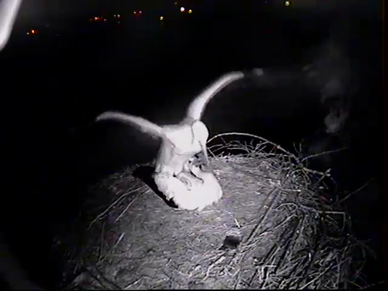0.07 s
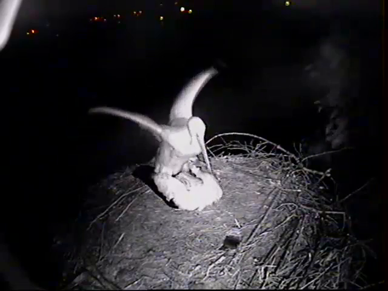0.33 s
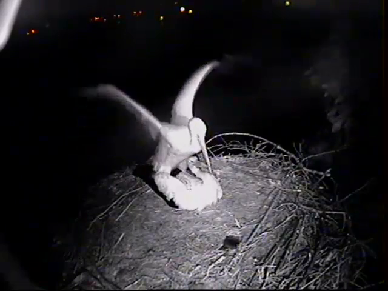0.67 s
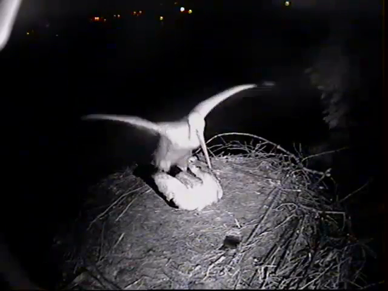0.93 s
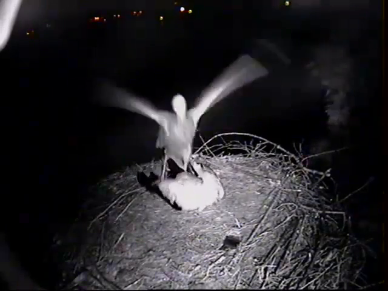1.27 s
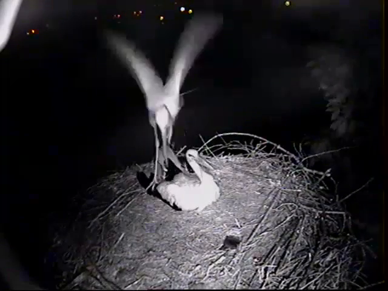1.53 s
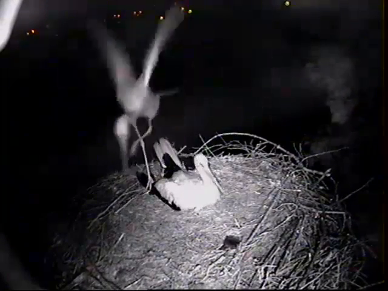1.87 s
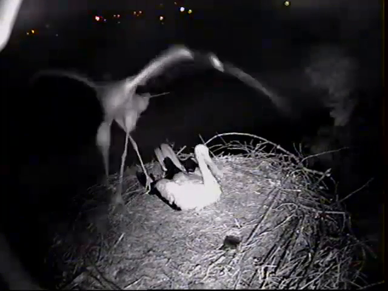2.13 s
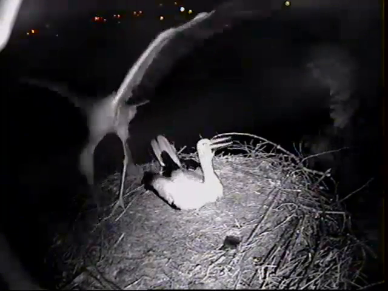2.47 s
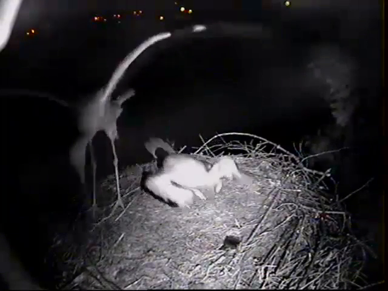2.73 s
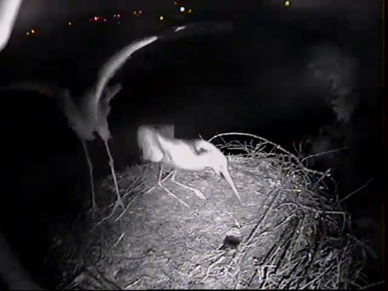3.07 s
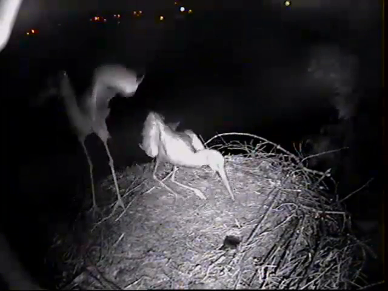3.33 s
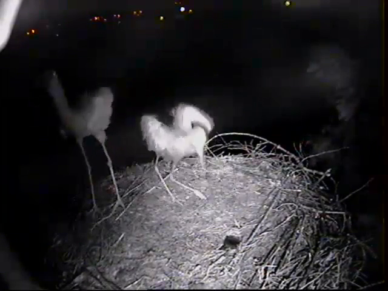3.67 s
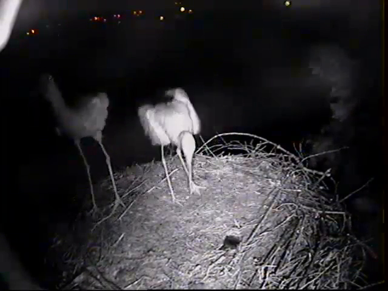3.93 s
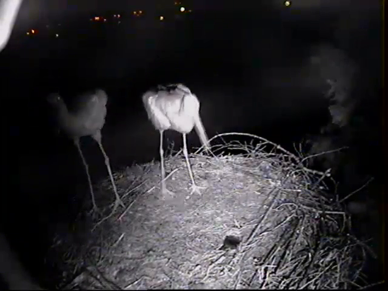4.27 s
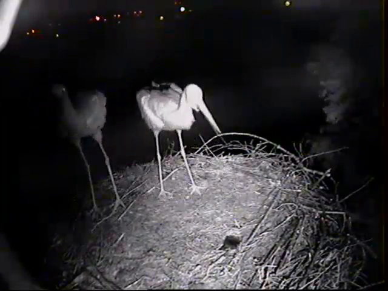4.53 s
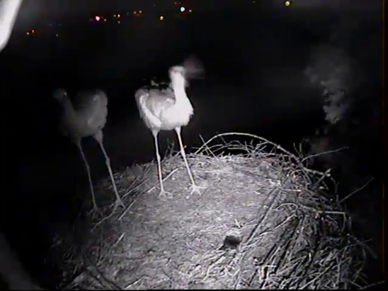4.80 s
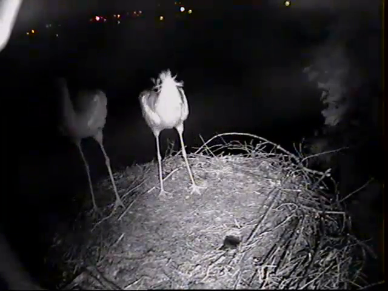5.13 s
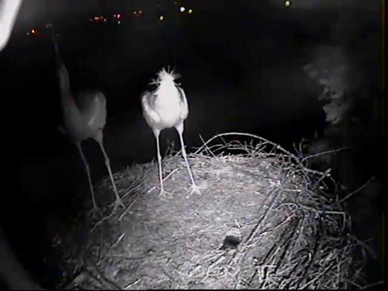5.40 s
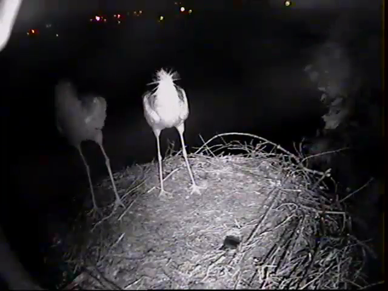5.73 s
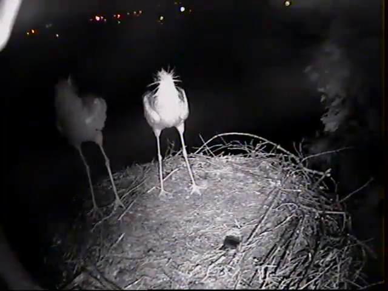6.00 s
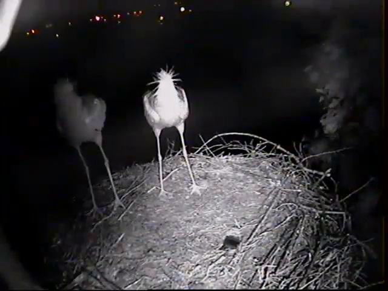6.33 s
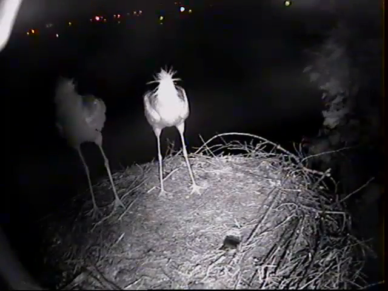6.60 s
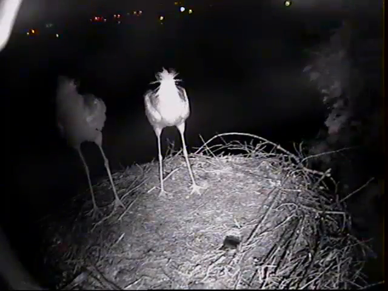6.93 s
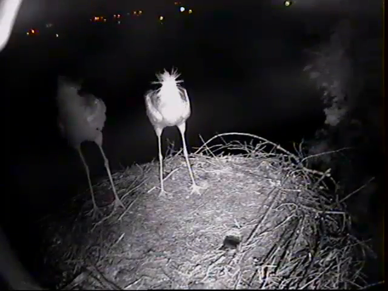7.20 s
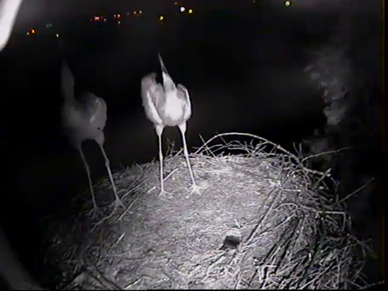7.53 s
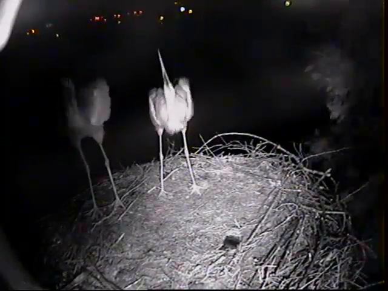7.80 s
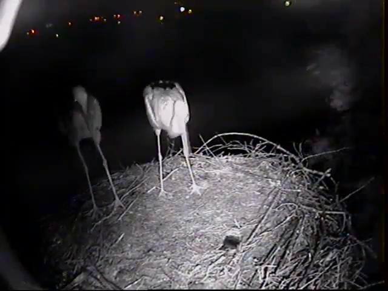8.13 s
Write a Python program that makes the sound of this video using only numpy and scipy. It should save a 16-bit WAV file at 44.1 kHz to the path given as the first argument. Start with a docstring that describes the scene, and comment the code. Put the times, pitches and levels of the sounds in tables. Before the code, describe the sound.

Two storks clatter their bills rapidly after a few whistling wingbeats and twig cracks, with wind rumbling on the microphone.

```python
"""Storks clattering on a night nest.

One bird flaps off the other's back, air whistling through its feathers, and twigs crack underfoot.
Then both clatter their bills: ringing mandibles over a hollow throat pouch, at two drifting tempos.
Gusts rumble on the microphone and overload its input, so the clacks come through crushed."""
import sys
import numpy as np
from scipy import signal
from scipy.fft import rfft, irfft
from scipy.io import wavfile

SR = 44100
rng = np.random.default_rng(int(sys.argv[2]) if len(sys.argv) > 2 else 0)


def wrap_up_sound(samples):
    """Save the sound to the file named by the first command line argument, as 16-bit audio."""
    columns = np.atleast_2d(samples).T
    # keep every value between -1 and 1, then stretch to whole-number steps
    tamed = np.clip(columns, -1, 1)
    steps = np.round(tamed * 32767).astype(np.int16)
    wavfile.write(sys.argv[1], SR, steps)


N = 360297


def undb(db):
    """Decibels to gain."""
    return 10 ** (np.asarray(db) / 20)


def add(track, start_s, sound):
    """Mix a sound into a track from a given time on."""
    i = int(start_s * SR)
    part = sound[:max(len(track) - i, 0)]
    track[i:i + len(part)] += part


def curve(time_s, points):
    """Read an automation curve of (time, value) points."""
    return np.interp(time_s, *np.transpose(points))


def noise(points, size=N):
    """Noise of rms 1, coloured by (frequency [Hz], level [dB]) points."""
    hz, db = np.transpose(points)
    bins = np.maximum(np.fft.rfftfreq(size, 1 / SR), 1)
    colour = undb(np.interp(np.log(bins), np.log(hz), db))
    x = irfft(rfft(rng.standard_normal(size)) * colour, size)
    return x / x.std()


def fade(t, t60):
    """Exponential decay, 60 dB down after t60 seconds."""
    return np.exp(-np.log(1000) * t / t60)


def saturate(x, rail, knee):
    """Overload: clean for small swings, flat beyond the rail."""
    return x / (1 + np.abs(x / rail) ** knee) ** (1 / knee)


# colour of the hiss: (frequency [Hz], relative level [dB])
HISS_COLOUR = [(100, 1.5), (600, 4.5), (1500, 1), (3000, 2), (5000, -4)]
def hiss(db):
    """A steady hiss: in the wind bed it is air rushing through the nest sticks; after the input, the
    microphone's own noise floor."""
    return undb(db) * noise(HISS_COLOUR)


# swell of the gusts: (time [s], level [dB])
GUST_LEVELS = [(0, 1), (.4, -6.5), (.95, -8), (1.15, -12), (1.68, -18), (1.971, -5.5), (2.15, -13),
               (2.4, -6.5), (2.67, -12.5), (3.15, 6), (3.6, 7), (3.9, 4), (4.8, 3), (5.4, 1.6), (5.9, -5),
               (7.1, 3.5), (7.6, 2.5), (7.9, 0.5)]
# colours of the deep buffeting and the finer eddies: (frequency [Hz], relative level [dB])
BUFFET_COLOUR = [(10, -28), (20, -4.5), (34, -2.5), (55, -5.5), (90, -13), (150, -23), (280, -43),
                 (900, -70.5)]
EDDY_COLOUR = [(40, -21), (100, -7.5), (200, -9.5), (400, -20), (1500, -55)]
def wind(eddy_db=-15, eddy_growth=1.2):
    """Gusts buffet the microphone; small eddies swell faster than the low rumble."""
    gust_db = curve(np.arange(N) / SR, GUST_LEVELS)
    rumble = undb(gust_db) * noise(BUFFET_COLOUR)
    eddies = undb(eddy_db + eddy_growth * gust_db) * noise(EDDY_COLOUR)
    return rumble + eddies


# colour of the echoes around the nest: (frequency [Hz], relative level [dB])
ECHO_COLOUR = [(400, -16), (780, 12.5), (1150, 5), (1550, 10), (2100, 8.5), (2650, 7), (3300, 16),
               (4800, 11.5)]
def reflections(x, db, t60, build_s):
    """A dense patter of echoes that builds up and dies away."""
    t = np.arange(min(len(x), int(SR / 2))) / SR
    echoes = noise(ECHO_COLOUR, size=len(t)) * fade(t, t60) * (1 - fade(t, build_s))
    return undb(db) * signal.fftconvolve(x, echoes / np.linalg.norm(echoes))[:len(x)]


def flutter(width_hz, size):
    """A random complex amplitude that smears a pure tone into a breathy band."""
    z = signal.sosfilt(signal.butter(2, width_hz / 2, fs=SR, output="sos"), rng.standard_normal((2, size)))
    return (z[0] + 1j * z[1]) / z.std()


# wing strokes: (time of top speed [s], half length [s], relative level [dB], top pitch [Hz], rasp [dB])
WING_STROKES = [(.01, 0.03, -14.5, 1507, -10), (1.007, 0.039, -14, 1734, -6.5),
                (1.41, 0.034, -17, 1574, -5), (1.783, 0.036, -20, 1530, 6.5),
                (1.997, 0.041, -14.5, 1570, -3), (2.343, 0.036, -26.5, 1032, 2.5),
                (2.671, 0.047, -30.5, 900, 1.5)]
# rasp of the feather vanes: (frequency [Hz], relative level [dB])
RASP_COLOUR = [(2100, -21), (2600, 3.5), (2900, -5), (3300, 2.5), (3800, -11), (4600, -9.5)]
def wings(bend=0.14, width_hz=460, release_stretch=1.3):
    """Air sings through the flight feathers: a whistle and a rasp that follow the stroke's speed."""
    out = np.zeros(N)
    for peak_s, half_s, db, hz, rasp_db in WING_STROKES:
        start_s = max(peak_s - 2 * half_s, 0)
        stroke = (start_s + np.arange(int(SR / 3)) / SR - peak_s) / half_s
        # steep attack, gentler release
        speed = np.exp(-np.where(stroke < 0, stroke ** 2, stroke / release_stretch) ** 2)
        phase = 2 * np.pi * np.cumsum(hz * (1 - bend * (1 - speed))) / SR
        whistle = (flutter(width_hz, len(stroke)) * np.exp(1j * phase)).real
        rasp = undb(rasp_db) * noise(RASP_COLOUR, size=len(stroke))
        add(out, start_s, undb(db) * speed * (whistle + rasp))
    return out


# twig cracks: (time [s], level [dB])
TWIG_CRACKS = [(2.832, -9), (2.886, -19), (2.910, -15), (2.923, -19), (2.937, -9.5), (2.958, 1.5),
               (2.964, -12), (4.791, -8), (4.806, -1)]
def twigs():
    """Dry sticks break underfoot in short, broadband cracks."""
    out, t = np.zeros(N), np.arange(int(SR / 10)) / SR
    for start_s, db in TWIG_CRACKS:
        crack = noise([(200, 20.0), (900, 3.5), (3000, 2), (5000, 1.5), (9000, -28)], size=len(t))
        add(out, start_s, undb(db) * fade(t, t60=0.048) * crack)
    return out


def mode(t, hz, t60, db):
    """One struck resonance."""
    return undb(db) * fade(t, t60) * np.sin(2 * np.pi * hz * t)


# the bill's upper ring: (frequency before tuning [Hz], t60 [s], relative level [dB])
UPPER_MODES = [(2457, 0.0095, -9.5), (2620, 0.02, -9), (3056, 0.0069, -14), (3558, 0.024, -20),
               (3970, 0.051, -24.5), (4575, 0.079, -29.5)]
def clack(pouch_hz, mandible_hz, hard_db, pitch_ratio):
    """The mandibles strike and ring over the hollow pouch; harder hits wake the upper modes."""
    t = np.arange(int(SR / 10)) / SR
    scatter = rng.standard_normal((len(UPPER_MODES), 4))
    body = mode(t, pouch_hz, t60=0.021, db=-6.0) - mode(t, mandible_hz, t60=0.015, db=-2.0)
    body += mode(t, mandible_hz * 1.4, t60=0.0028, db=-9)  # the other mandible's short, higher knock
    upper = 0
    for k, (hz, t60, db) in enumerate(UPPER_MODES):
        detune, accent, tail_accent, tail_detune = scatter[k]
        struck_hz = pitch_ratio * hz * (1 + 0.0193 * detune)
        upper += (-1) ** k * mode(t, struck_hz, t60, db + 3 * accent)
        # as the bill springs open, a faint tail rings on at a shifted pitch
        tail_hz = struck_hz * (1 + 0.0416 * tail_detune)
        upper += mode(t, tail_hz, t60=0.092, db=db - 15.5 + 5.3 * tail_accent)
    burst = noise([(300, 0.5), (700, 17.0), (3000, -36), (5500, 2)], size=len(t))
    crack = undb(-13.5) * fade(t, t60=0.033) * burst
    direct = body + undb(hard_db) * upper + crack
    # fresh near reflections on every hit, as the head swings
    return direct + reflections(direct, db=-9, t60=0.059, build_s=0.28)


def snap(pouch_hz, mandible_hz, hard_db, pitch_ratio, touch_s=0.0045, rebound_s=0.0024):
    """The long mandibles touch, shut fully and bounce once: (delay [s], sound) for each contact."""
    early, late = .5 + rng.random(2)
    contacts = [(-touch_s * early, -21), (0, 0), (rebound_s * late, -5.5)]
    return [(delay_s, undb(db) * clack(pouch_hz, mandible_hz, hard_db, pitch_ratio))
            for delay_s, db in contacts]


# the throat pouch tightens as the head is thrown back: (time [s], resonance before tuning [Hz])
POUCH_PITCH = [(3.0, 648), (4.5, 701), (5.5, 737), (6.4, 794), (7.57, 912), (7.67, 758)]
def clatter(tempo, note, level_db, hard_db, haste_db, warm_up_s, pitch_ratio,
            start_db=-13, fade_db_per_s=-1.0, easy_clacks_per_s=7.46):
    """One bird's roll of snaps: it starts softly, warms up to full force, then slowly grows quieter."""
    out = np.zeros(N)
    now_s = first_s = tempo[0][0]
    while now_s < N / SR:
        rate, elapsed_s = curve(now_s, tempo), now_s - first_s
        force, hardness, detune, pouch_detune = rng.standard_normal(4)
        envelope_db = start_db * max(1 - (elapsed_s / warm_up_s) ** 2, 0) + fade_db_per_s * elapsed_s
        # a faster bill opens less and strikes more lightly: haste_db per extra clack a second
        db = level_db + envelope_db + haste_db * (rate - easy_clacks_per_s) + 1.93 * force
        mandible_hz = curve(now_s, note) * (1 + 0.03 * detune)
        pouch_hz = pitch_ratio * curve(now_s, POUCH_PITCH) * (1 + 0.069 * pouch_detune)
        for delay_s, sound in snap(pouch_hz, mandible_hz, hard_db + 2.0 * hardness, pitch_ratio):
            add(out, now_s + delay_s, undb(db) * sound)
        now_s += 1 / rate
    return out


# pace of the bird mid-nest and its mate at the rim, from the first clack: (time [s], tempo [clacks/s])
CENTRE_TEMPO = [(3.084, 7.75), (3.34, 7.67), (3.93, 8.17), (4.97, 8.52), (5.26, 11.45), (5.74, 11.92),
                (6.3, 11.11), (6.94, 10.24), (7.51, 8.74), (7.81, 8.1)]
RIM_TEMPO = [(3.198, 6.58), (3.4, 7.57), (3.83, 6.99), (4.29, 7.33), (4.68, 9.91), (5.53, 9.85),
             (5.91, 9.19), (6.84, 8.61), (7.32, 7.77), (7.77, 7.23)]
# each bill's note glides as the head swings back and forward: (time [s], mandible pitch [Hz])
CENTRE_NOTE = [(3.6, 1465), (5.2, 1538), (7.2, 1554), (8.05, 2050)]
RIM_NOTE = [(3.6, 1760), (4.1, 1910), (4.6, 2090), (4.85, 1550), (6.7, 1547), (8.0, 2080)]
def bill_duet():
    """A loud, round clatter and a lighter, sharper one drift in and out of step."""
    centre = clatter(CENTRE_TEMPO, CENTRE_NOTE, level_db=13, hard_db=-4.5, haste_db=-1.72,
                     warm_up_s=0.52, pitch_ratio=0.96)
    rim = clatter(RIM_TEMPO, RIM_NOTE, level_db=6.0, hard_db=2, haste_db=-1.0,
                  warm_up_s=0.79, pitch_ratio=1.02)
    return centre + rim


def scene():
    """Birds and wind in mono; roofs and trees around the nest return a faint wash of the clatter."""
    bills = bill_duet()
    wash = reflections(bills, db=-19.5, t60=1.0, build_s=0.92)
    bed = wind() + undb(0.5) * wings() + hiss(db=-28.5)
    # a gust that pins the microphone at its limit chokes the soft sounds; bills and twigs break through
    choked_bed = saturate(bed, rail=0.7197, knee=43)
    return (choked_bed + bills + wash + twigs())[None]


def record(dry, band_hz=5030, top_hz=15900, ceiling=np.sqrt(.5)):
    """The input overloads and hisses, a steep low-pass dulls it, and the output clips the overshoot."""
    crushed = saturate(dry, rail=0.74, knee=35) + hiss(db=-35)
    narrow = signal.sosfiltfilt(signal.ellip(10, .05, 50, band_hz, fs=SR, output="sos"), crushed)
    clipped = np.clip(narrow, -ceiling, ceiling)
    return signal.sosfiltfilt(signal.ellip(10, .05, 50, top_hz, fs=SR, output="sos"), clipped)


dry = scene()
out = record(dry)
wrap_up_sound(out)
```